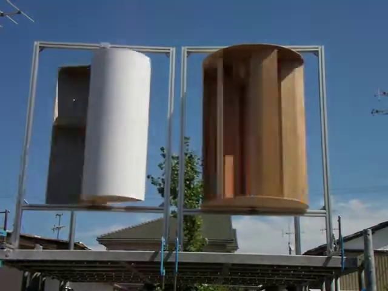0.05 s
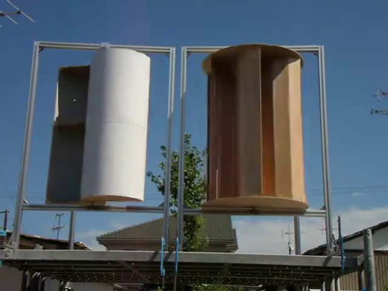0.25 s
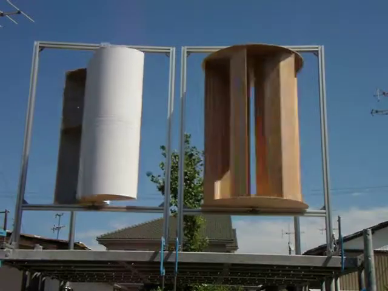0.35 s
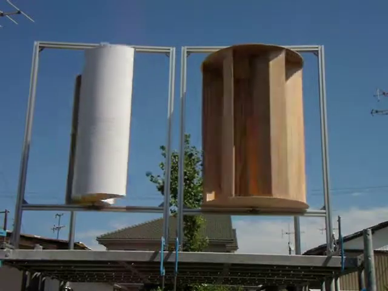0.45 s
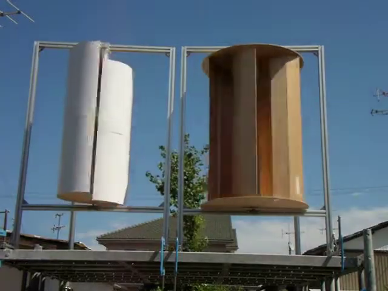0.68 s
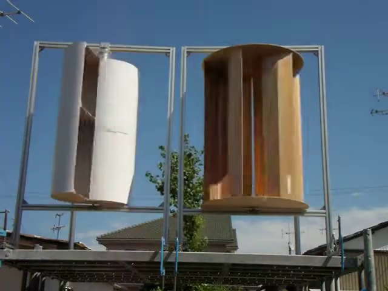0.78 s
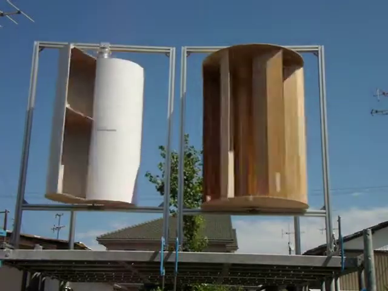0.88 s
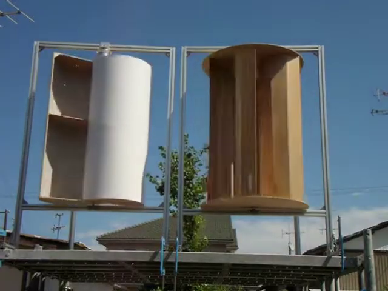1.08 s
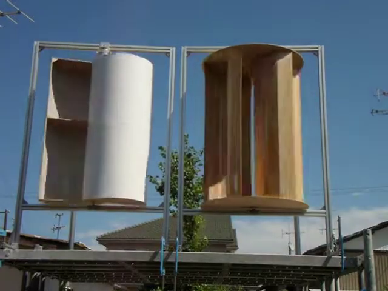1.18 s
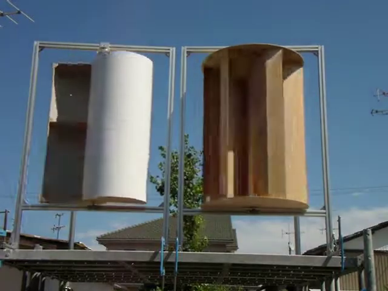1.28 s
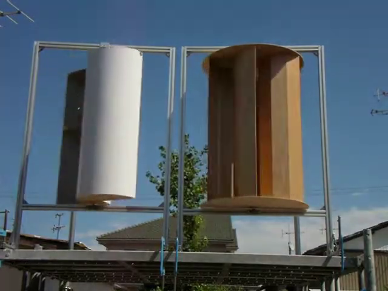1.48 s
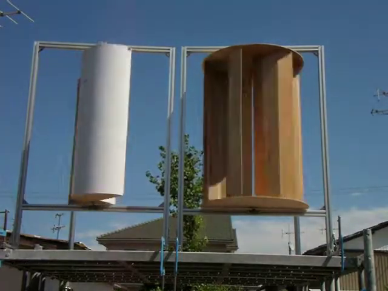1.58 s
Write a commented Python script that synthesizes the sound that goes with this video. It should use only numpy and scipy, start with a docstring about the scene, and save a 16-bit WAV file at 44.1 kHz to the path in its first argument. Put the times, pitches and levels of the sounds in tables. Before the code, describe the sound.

Wind rumbles on a small microphone outdoors, with one hard thump near the start and more uneven buffets after it. Behind it, two small wind turbines whirr faintly in a steady hiss of air and give one short creak near the end.

```python
"""Outdoors, beside two homemade vertical wind turbines.
Gusts rumble on a small microphone, single eddies buffet it, and one blast overloads it with a thump.
Behind them: one short stick-slip creak, the faint whirr and whine of the rotors, a steady hiss of air."""
import sys
import numpy as np
from scipy import signal
from scipy.fft import rfft, irfft
from scipy.io import wavfile
from scipy.ndimage import uniform_filter1d

SR = 44100
rng = np.random.default_rng(int(sys.argv[2]) if len(sys.argv) > 2 else 0)


def persist_wave(psi):
    """Save psi, clipped to +-1, as 16-bit WAV."""
    counts = np.round(np.clip(psi, -1, 1) * 32767).astype(np.int16)
    wavfile.write(sys.argv[1], SR, np.atleast_2d(counts).T)


N = 72765


# Gusts on the microphone: crest_s, level_db, half_width_s
GUST_CRESTS = [(0.21, -23.5, 0.011), (0.257, -27, 0.0078), (0.316, -31, 0.033), (0.361, -26.5, 0.012),
               (0.424, -27, 0.011), (0.495, -26, 0.03), (0.573, -23.5, 0.015), (0.612, -28.5, 0.021),
               (0.679, -24, 0.015), (0.761, -33, 0.034), (0.818, -25.5, 0.014), (0.885, -33, 0.0078),
               (0.955, -26.5, 0.024), (1.048, -34, 0.014), (1.166, -34.5, 0.034), (1.242, -30.5, 0.033),
               (1.327, -34, 0.048), (1.549, -29, 0.035), (1.618, -33, 0.021)]

def gusts(t):
    """Gusts swell and fade over a light breeze; stronger flow sounds brighter."""
    breeze_db, split_hz, bright_ref_db = -43.5, 180, -28
    gust_power = sum(undb(level_db) ** 2 * np.exp(-((t - crest_s) / half_width_s) ** 2)
                     for crest_s, level_db, half_width_s in GUST_CRESTS)
    strength = np.sqrt(undb(breeze_db) ** 2 + gust_power)
    churn = turbulence()
    low = signal.sosfiltfilt(signal.butter(2, split_hz, fs=SR, output="sos"), churn)
    brightness = (strength / undb(bright_ref_db)) ** 0.8
    return strength * (low + brightness * (churn - low))


# Turbulent pressure spectrum: freq_hz, relative_density_db
TURBULENCE_SPECTRUM = [(20, -36.5), (40, -28), (70, -7), (140, 1), (230, -0.5), (360, -6.5), (480, -14.5),
                       (700, -26), (1200, -47), (2000, -44), (4000, -82)]

def turbulence(window_s=0.012):
    """Low churning pressure, levelled to even strength."""
    pressure = noise(TURBULENCE_SPECTRUM)
    local_power = uniform_filter1d(pressure ** 2, int(window_s * SR))
    return pressure / np.sqrt(local_power + 1e-9)


# Eddies hitting the microphone: peak_s, peak_db, pitch_hz
EDDY_HITS = [(0.2055, -17.5, 190), (0.2268, -3, 182.6), (0.2552, -19, 191), (0.3535, -19, 168),
             (0.4884, -16, 193), (0.5046, -20, 200), (0.5183, -8, 403), (0.5220, -5.5, 258),
             (0.555, -13, 329), (0.6155, -18.5, 217), (0.852, -16, 197.7), (0.9495, -21, 200),
             (0.9626, -16, 230), (0.9737, -17.5, 282), (1.1886, -16, 213)]

def eddies(t):
    """Each eddy swings the pressure for a cycle or two; hard ones tear into finer grit."""
    rise_cycles, fall_cycles, grit_db = 0.8, 0.56, -14.5
    grit = unit(resonate(rng.standard_normal(N), centre_hz=880, stage_width_hz=560))
    pressure = np.zeros(N)
    for peak_s, peak_db, pitch_hz in EDDY_HITS:
        cycles = (t - peak_s) * pitch_hz
        width_cycles = np.where(cycles < 0, rise_cycles, fall_cycles)
        swell = undb(peak_db) * np.exp(-(cycles / width_cycles) ** 2)
        pressure += swell * np.cos(2 * np.pi * cycles) + undb(grit_db) * swell ** 2 * grit
    return pressure


def blast(t):
    """Thump: pressure swings grow and quicken, then the flow breaks off with a snap of suction."""
    end_s, level_db, rise_s, break_s = 0.2354, -2, 0.0055, 0.00013
    start_hz, end_hz, sweep_s = 134, 424, 0.0057
    snap_db, snap_s = -10, 0.00019
    left_s = np.maximum(end_s - t, 0)
    cycles = start_hz * left_s + (end_hz - start_hz) * sweep_s * (1 - np.exp(-left_s / sweep_s))
    swell = np.exp(-(left_s / rise_s) ** 4) * np.clip(left_s / break_s, 0, 1)
    snap = undb(snap_db) * np.exp(-((t - end_s + snap_s) / snap_s) ** 2)
    return -undb(level_db) * swell * np.cos(2 * np.pi * cycles) - snap


# Creak resonances: centre_hz, stage_half_width_hz, relative_db
CREAK_RESONANCES = [(1123, 82, 8), (1270, 51, -4.5)]

def creak(t):
    """Short creak, likely a bearing: quick slips ring two close resonances."""
    start_s, level_db, attack_s, hold_s, decay_s = 1.546, -40.5, 0.0091, 0.048, 0.03
    slip_hz = 187.2 * (1 + 0.0515 * drift(rate_hz=120))
    slip_count = np.floor(np.cumsum(slip_hz) / SR)
    slips = np.diff(slip_count, prepend=0)
    body = unit(sum(undb(relative_db) * resonate(slips, centre_hz, 2 * stage_half_width_hz)
                    for centre_hz, stage_half_width_hz, relative_db in CREAK_RESONANCES))
    age_s = t - start_s
    envelope = np.clip(age_s / attack_s, 0, 1) * np.exp(-np.maximum(age_s - hold_s, 0) / decay_s)
    return undb(level_db) * envelope * body


# Rotor whine: pitch_hz, rms_db
WHINE_TONES = [(2159, -66), (2987, -68)]

def rotors(t):
    """Turning rotors: a narrow whirr of wavering level and a thin steady whine."""
    whirr = unit(resonate(rng.standard_normal(N), centre_hz=885.5, stage_width_hz=142))
    whirr_db = -51.5 + 0.53 * drift(rate_hz=2.2)
    whine = sum(undb(rms_db) * np.sqrt(2) * np.sin(2 * np.pi * pitch_hz * t)
                for pitch_hz, rms_db in WHINE_TONES)
    return undb(whirr_db) * whirr + whine


# Outdoor hiss spectrum: freq_hz, relative_density_db
AIR_SPECTRUM = [(20, -28.5), (60, -0.5), (150, 1), (310, 3), (480, -3.5), (700, -7), (1000, -8.5),
                (1400, -10), (2200, -11.5), (3500, -14.5), (3850, -20.5), (4200, -29)]

def air(rms_db=-43):
    """Steady hiss of open air."""
    return undb(rms_db) * noise(AIR_SPECTRUM)


def undb(db):
    """Decibels to gain."""
    return 10 ** (np.asarray(db) / 20)


def unit(x):
    """Scale to rms 1."""
    return x / np.sqrt(np.mean(x ** 2))


def noise(spectrum):
    """Unit-rms noise shaped by (freq_hz, density_db) points."""
    freq_hz, density_db = np.array(spectrum).T
    bin_hz = np.maximum(np.arange(N // 2 + 1) * SR / N, 1)
    bin_db = np.interp(np.log(bin_hz), np.log(freq_hz), density_db)
    return unit(irfft(rfft(rng.standard_normal(N)) * undb(bin_db), N))


def resonate(x, centre_hz, stage_width_hz):
    """Two identical resonators in series, gain 1 at centre."""
    b, a = signal.iirpeak(centre_hz, centre_hz / stage_width_hz, fs=SR)
    return signal.lfilter(b, a, signal.lfilter(b, a, x))


def drift(rate_hz):
    """Smooth random wander, rms 1."""
    span = int(SR / rate_hz)
    steps = np.repeat(rng.standard_normal(N // span + 1), span)
    return unit(uniform_filter1d(uniform_filter1d(steps, span), span)[:N])


def lowpass(x, cutoff_hz):
    """Steep elliptic low-pass."""
    return signal.sosfilt(signal.ellip(8, 0.2, 80, cutoff_hz, fs=SR, output="sos"), x)


def gain_control(x):
    """Gain sinks slowly throughout; a loud peak drops it at once, with no recovery."""
    makeup_db, threshold_db, slope, sink_db_per_s = 3.5, -12, 0.23, 0.23
    sink_db = sink_db_per_s * np.arange(N) / SR
    over_db = np.maximum(20 * np.log10(np.abs(x) + 1e-9) - threshold_db, 0)
    cut_db = np.maximum.accumulate(slope * over_db - sink_db, axis=-1) + sink_db
    return x * undb(makeup_db - cut_db)


def scene():
    """Wind on the microphone over turbines and open air, mono."""
    t = np.arange(N) / SR
    return (gusts(t) + eddies(t) + blast(t) + rotors(t) + creak(t) + air())[None]


def record(dry):
    """Microphone chain: low cut, gain control, narrow band, overload that flattens the loudest peaks."""
    low_cut_hz, ceiling_db, hardness = 44, -3, 40
    x = signal.sosfilt(signal.butter(1, low_cut_hz, "high", fs=SR, output="sos"), dry)
    x = lowpass(gain_control(x), cutoff_hz=4050)
    clipped = x / (1 + np.abs(x / undb(ceiling_db)) ** hardness) ** (1 / hardness)
    return lowpass(clipped, cutoff_hz=11500)


dry = scene()
out = record(dry)
persist_wave(out)
```